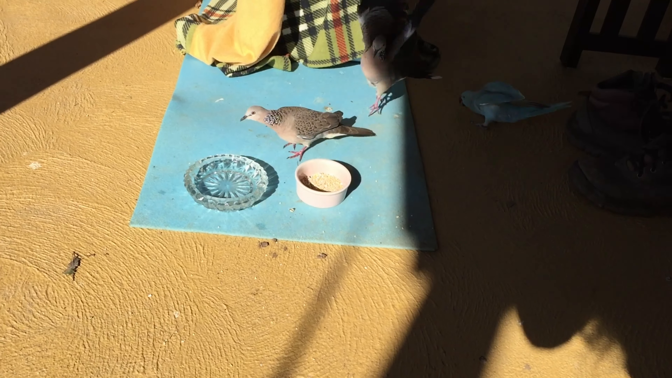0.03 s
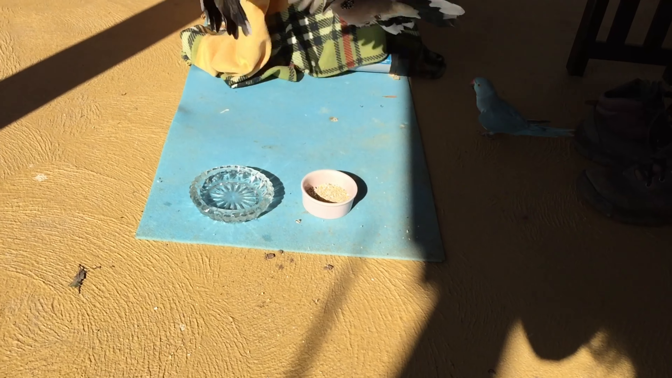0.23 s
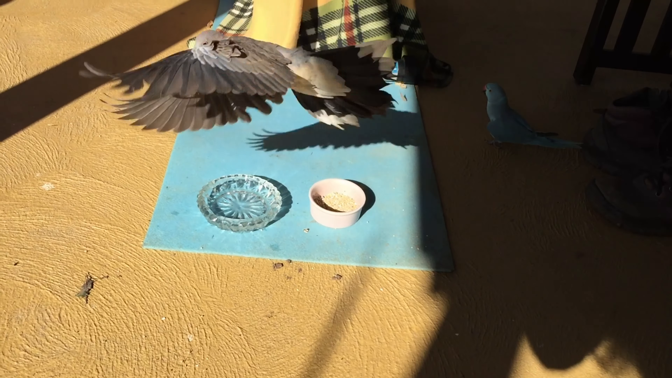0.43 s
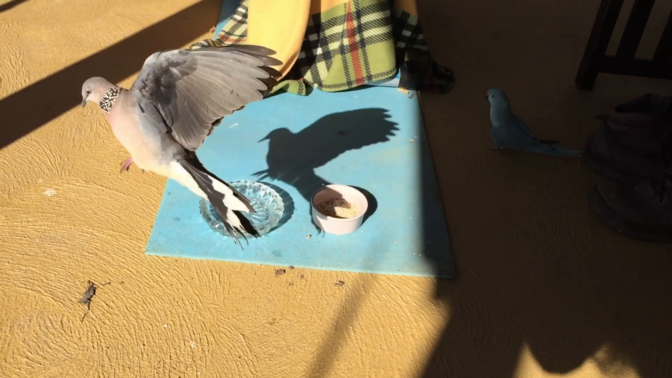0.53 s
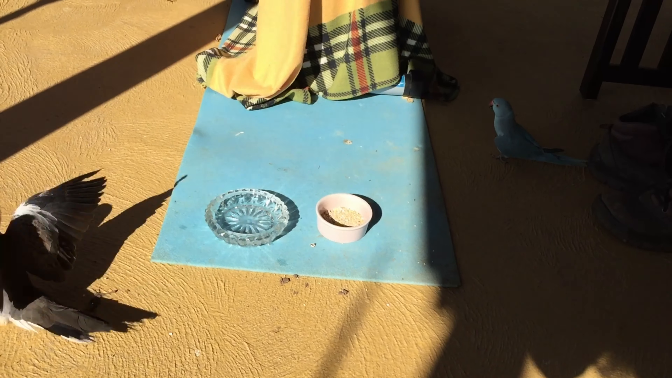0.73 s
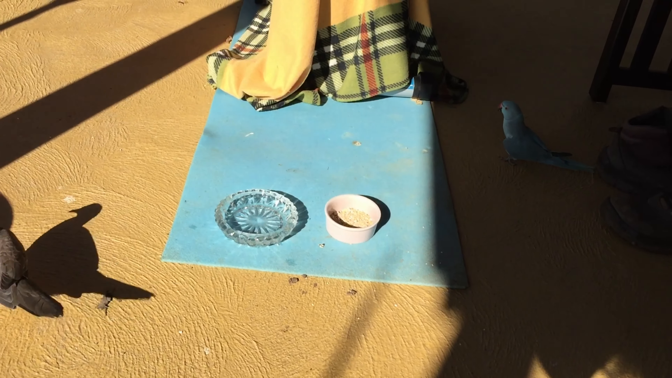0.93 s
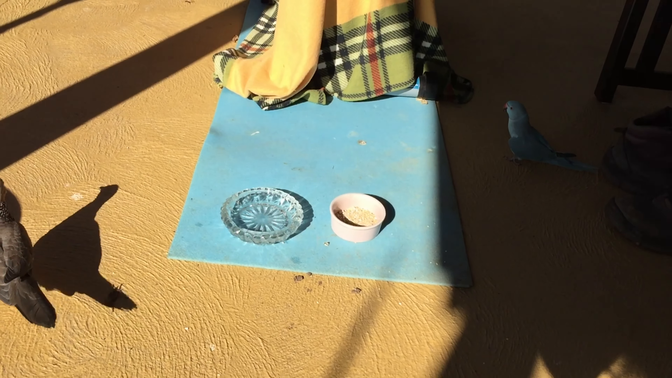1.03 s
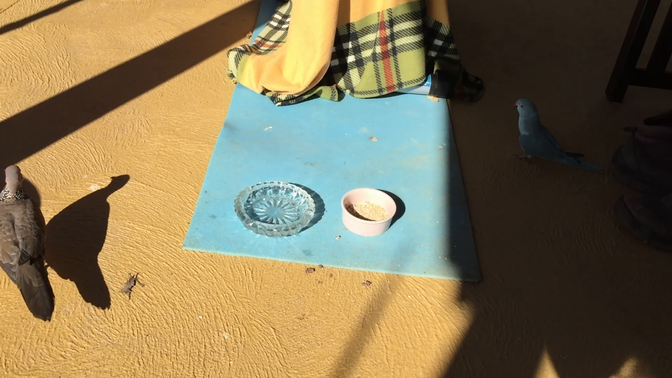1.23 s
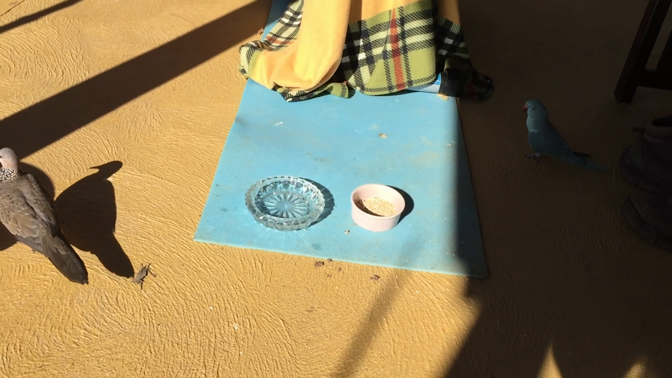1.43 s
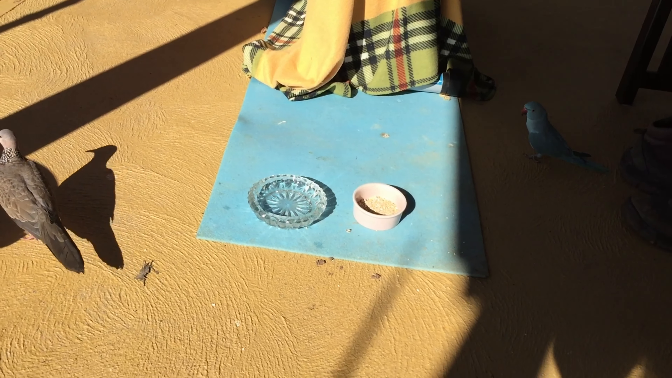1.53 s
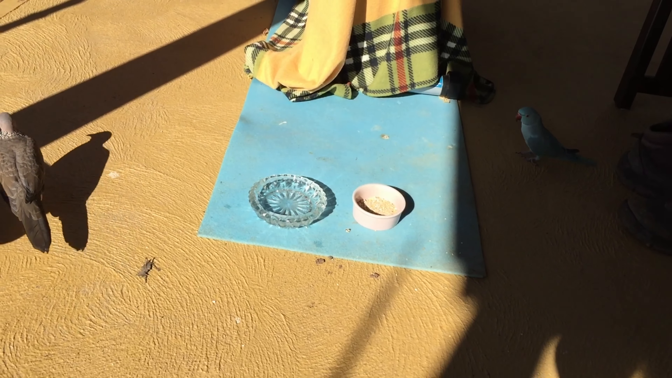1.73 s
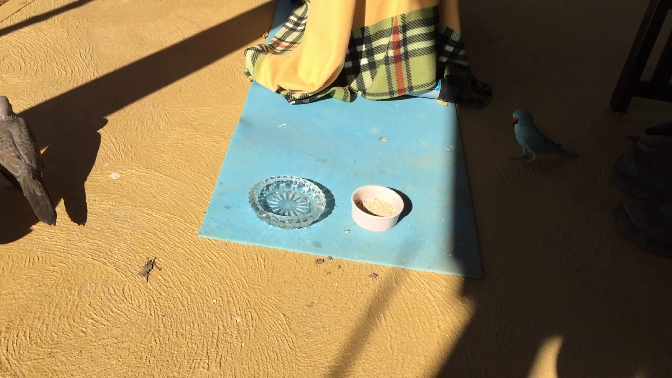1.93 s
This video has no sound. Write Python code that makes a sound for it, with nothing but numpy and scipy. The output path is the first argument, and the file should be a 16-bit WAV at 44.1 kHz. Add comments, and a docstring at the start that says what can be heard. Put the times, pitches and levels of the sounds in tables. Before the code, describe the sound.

Sharp, feathery wing flapping of a dove taking off close by, then faint claw ticks and a scuff

```python
"""A dove takes off beside a feeding bowl on a porch, close by, and settles a step away.
First come small floor ticks (band-filtered noise), then wing strokes (enveloped flicks and air noise),
low puffs (damped sines), short whistles (gliding tones) and one clap (a run of filtered snaps).
Feathers rustle between the strokes; later claws tick and a foot scuffs the floor (noise bursts). The porch
answers by early echoes and a diffuse tail, over an outdoor rumble (shaped noise and a wavering hum)."""
import sys
import numpy as np
from scipy import signal
from scipy.fft import rfft, irfft
from scipy.io import wavfile

SR = 44100
rng = np.random.default_rng(int(sys.argv[2]) if len(sys.argv) > 2 else 0)


def bounce(signal):
    """Save signal as a 16-bit WAV file at the path given by the first command-line argument."""
    frames = np.transpose(np.atleast_2d(signal))
    limited = np.clip(frames, -1, 1)
    pcm = np.round(limited * 32767).astype(np.int16)
    wavfile.write(sys.argv[1], SR, pcm)


N = 88200
T = np.arange(N) / SR  # time axis, s

# Wing strokes: peak t/s, rise t/s, fall t/s, level/dB, tilt above 1 kHz/(dB per octave)
STROKES = [(.188, .004, 0.0092, -32.5, 2), (0.244, .0025, 0.0095, -26.5, 1),
           (.261, .008, 0.0096, -21.5, 0.9), (.268, 0.0047, 0.011, -23.5, -2.5),
           (0.307, 0.0075, 0.0091, -36, -5), (0.337, 0.0053, 0.012, -21, -1.5),
           (0.351, 0.0073, .012, -21.5, -0.9), (.367, .0015, .010, -23.5, 0.5),
           (.388, 0.0067, .020, -29.5, -1.5), (0.434, 0.014, 0.0068, -28.5, 0.5),
           (.456, 0.0072, 0.016, -41, -1), (0.564, 0.018, 0.025, -40, 1.2), (.597, 0.013, 0.012, -37, -0.7),
           (0.709, 0.014, 0.022, -49, 4), (0.834, 0.018, 0.012, -41.5, 0.8),
           (1.246, 0.0022, 0.0065, -48, 0), (1.995, .012, .015, -54, -2)]
# Relative spectrum of the strokes and rustle as heard, with narrow dips near 2750 and 10200 Hz: f/Hz, level/dB
STROKE_SPECTRUM = [(60, -6), (150, -0.5), (370, 0), (520, -4), (750, -1.5), (1000, 2.5), (1600, -2),
                   (2000, -4), (2400, -5.5), (2750, -8.5), (3400, -7), (4800, -9.5), (7000, -10.5),
                   (9000, -11.5), (10200, -16.5), (12500, -15.5), (15500, -23.5)]
# Feather rustle under and between the strokes: t/s, level/dB
RUSTLE_LEVEL = [(0, -56), (.12, -56), (.165, -45.5), (.225, -42.5), (.29, -37.5), (.45, -40), (.52, -47.5),
                (.62, -46.5), (.66, -55.5), (.73, -49.5), (.79, -51), (.97, -53.5), (1.2, -55), (1.45, -62),
                (1.6, -67.5), (2, -64.5)]
# Relative spectrum of a quill snap: f/Hz, level/dB
QUILL_SPECTRUM = [(60, -41), (200, -26), (450, -14), (800, -2), (1500, 0), (2400, -0.5), (2800, -7),
                  (3400, 1), (4800, -7.5), (8200, -2), (10500, -8.5), (13000, -10.5), (16000, -23)]
# Whistling flight feathers: middle t/s, half length t/s, pitch f/Hz, level/dB
WHISTLES = [(0.27, 0.0043, 1180, -24), (0.343, 0.012, 2408, -29.5), (0.433, 0.0055, 1260, -21),
            (0.44, 0.0097, 1120, -31.5), (0.455, .007, 933, -36), (.465, 0.022, 1211, -40.5),
            (0.503, .004, 1244, -38), (1.802, 0.0057, 2174, -52)]
# Puffs of air pushed by the wings: onset t/s, pitch f/Hz, decay t/s, level before the envelope/dB
PUSHES = [(0.184, 171, 0.016, -34.5), (0.263, 225, 0.0044, -16), (0.266, 70, 0.028, -26.5),
          (0.3672, 160, 0.0043, -15.5), (.368, 329, 0.0043, -16), (.366, 72, 0.032, -26),
          (.438, 113.5, 0.012, -28.5), (1.285, 96, 0.023, -34.5)]
# Claws and feathers on the floor: peak t/s, fall t/s, level/dB, centre f/Hz, half-power half-width/octaves
TICKS = [(0.0654, .002, -42.5, 3000, 2.9), (0.067, 0.011, -45.5, 1750, 0.28),
         (0.136, 0.0027, -40, 4630, 0.31), (0.144, 0.0032, -34, 4440, 0.27),
         (0.69, 0.0032, -46.5, 4600, 0.39), (.988, 0.011, -53.5, 2860, 0.21),
         (1.059, 0.024, -49, 1450, 0.46), (1.141, 0.0043, -43.5, 3880, 0.95),
         (1.159, 0.046, -47, 1190, 0.4), (1.347, 0.0021, -41, 8240, .6), (1.360, 0.019, -55, 7600, 0.19),
         (1.412, 0.014, -55.5, 6330, 0.49), (1.470, 0.0057, -52.5, 4640, 0.44),
         (1.533, 0.0018, -51.5, 9000, 1), (1.730, 0.013, -64.5, 11000, 0.71),
         (1.802, 0.0041, -50.5, 1900, 0.16)]
# Relative spectrum of the foot scuff: f/Hz, level/dB
SCUFF_SPECTRUM = [(100, -14), (220, 1.5), (450, -1), (750, -1.5), (1100, 3), (1500, -9), (2500, -8.5),
                  (4300, -18.5), (9000, -25), (15000, -43)]
# Reverberation of the porch: f/Hz, time to decay by 60 dB t/s
PORCH_T60 = [(100, 0.16), (1000, 0.46), (4000, 0.67), (14000, 0.53)]
# Relative spectrum of the outdoor rumble: f/Hz, level/dB
RUMBLE_SPECTRUM = [(20, -46), (36, -16.5), (52, -7), (65, -4.5), (80, -6.5), (105, -7), (140, -12),
                   (200, -19), (320, -30), (600, -64)]
# Course of the rumble: t/s, level/dB
RUMBLE_LEVEL = [(0, -45.5), (.65, -44), (1.2, -45), (1.4, -45.5), (2, -48.5)]
# Relative spectrum of the distant wash: f/Hz, level/dB
YARD_SPECTRUM = [(150, -33), (250, -5), (378, -1.5), (413, -4), (646, -2.5), (717, -8), (837, 1),
                 (1290, -6.5), (2130, -10), (3510, -18.5), (15500, -31)]

BARBS_PER_S, BARB_SPREAD_DB = 4600, 3.5
AIR_SHARE = 0.59  # share of power in smooth air noise
FLUTTER_HZ, FLUTTER_DB = 130, 2
RUSTLE_TILT_DB, RUSTLE_WAVER_DB = 0.38, 1.1  # tilt per octave above 1 kHz; rms waver
CLAP_S, CLAP_DB = .3306, 1.5  # level is energy per quill
QUILL_GAP_S, QUILL_FADE_DB, QUILL_RING_S = .00102, -0.3, 0.0012  # fade is per quill
WHISTLE_SAG_PER_S, WHISTLE_JITTER, OVERTONE_DB = 3, 0.0382, -15.5  # sag and jitter: fractions of pitch
PUSH_RISE_S = 0.0009
TICK_RISE_SHARE = .5  # rise as a share of the fall time
SCUFF_S, SCUFF_RISE_S, SCUFF_FALL_S, SCUFF_DB = 1.274, 0.0037, 0.02, -38
PORCH_DB, EARLY_DB = -14.5, -13.5
RUMBLE_WAVER_DB = 1
HUM_HZ, HUM_DB, HUM_WANDER = 65.25, -49.5, 0.0798  # wander: rms fraction of pitch
YARD_DB, YARD_FADE_DB_PER_S = -55.5, 1.5  # level at 1 s
EDGE_HZ = 15820


def feathers():
    """Superposed impulses and turbulence: barbs flick past each other in rushing air; the vanes flutter."""
    struck = rng.random(N) < BARBS_PER_S / SR
    sign = rng.choice([-1, 1], N)
    strength = amp(BARB_SPREAD_DB * np.minimum(rng.exponential(1, N), 3))
    flicks = evened(struck * sign * strength)
    air = rng.standard_normal(N)
    mixture = np.sqrt(1 - AIR_SHARE) * flicks + np.sqrt(AIR_SHARE) * air
    return mixture * amp(FLUTTER_DB * drift(FLUTTER_HZ))


def wings():
    """Amplitude modulation of broadband noise: strokes swell and die, with feather rustle in between."""
    out = np.zeros(N)
    for s, rise, fall, db, tilt in STROKES:
        out += amp(db) * swell(s, rise, fall) * colour(feathers(), STROKE_SPECTRUM, tilt)
    rustle_db = np.interp(T, *np.transpose(RUSTLE_LEVEL)) + RUSTLE_WAVER_DB * drift(44.6)
    return out + amp(rustle_db) * colour(feathers(), STROKE_SPECTRUM, RUSTLE_TILT_DB)


def clap(count=5):
    """Impact excitation: the wing tips meet in a quick run of quill snaps."""
    snaps = np.zeros(N)
    for k in range(count):
        snaps += amp(QUILL_FADE_DB * k) * evened(snap(CLAP_S + k * QUILL_GAP_S, QUILL_RING_S))
    return amp(CLAP_DB) * np.sqrt(count) * ring(snaps, QUILL_SPECTRUM)


def whistles():
    """Aeroelastic flutter: a feather edge catches the air; its pitch sags as the wing slows."""
    out = np.zeros(N)
    for s, half_length, hz, db in WHISTLES:
        pitch = hz * (1 - WHISTLE_SAG_PER_S * (T - s) + WHISTLE_JITTER * drift(311))
        phase = 2 * np.pi * np.cumsum(pitch) / SR
        tone = evened(np.sin(phase) + amp(OVERTONE_DB) * np.sin(2 * phase))
        hold = 1 / (1 + ((T - s) / half_length) ** 8)
        out += amp(db) * hold * tone
    return out


def pushes():
    """Damped oscillation: the wings push low, quickly decaying puffs of air."""
    out = np.zeros(N)
    for s, hz, decay, db in PUSHES:
        t = np.maximum(T - s, 0)
        envelope = (1 - np.exp(-t / PUSH_RISE_S)) * np.exp(-t / decay)
        out += amp(db) * envelope * np.sin(2 * np.pi * hz * t)
    return signal.sosfilt(signal.butter(4, 36, "high", fs=SR, output="sos"), out)


def feet():
    """Contact noise: small ticks and brushes in narrow or wide bands, and one heavier scuff."""
    out = np.zeros(N)
    for s, fall, db, hz, width in TICKS:
        out += amp(db) * swell(s, TICK_RISE_SHARE * fall, fall) * band(feathers(), hz, width)
    scuff = swell(SCUFF_S, SCUFF_RISE_S, SCUFF_FALL_S) * colour(feathers(), SCUFF_SPECTRUM)
    return out + amp(SCUFF_DB) * scuff


def porch(x, count=8):
    """Reverberation by convolution: early echoes off floor and walls, and a short diffuse tail."""
    hz, t, z = signal.stft(rng.standard_normal(SR), SR, nperseg=256)
    decay = amp(-60 * t / read(PORCH_T60, hz)[:, None])
    build_up = 1 - np.exp(-t / 0.0071)
    tail = signal.istft(z * decay * build_up, SR, nperseg=256)[1]
    response = amp(PORCH_DB) * tail / np.linalg.norm(tail)
    delays = (rng.uniform(.003, .024, count) * SR).astype(int)
    response[delays] += amp(EARLY_DB) * rng.choice([-1, 1], count) / np.sqrt(count)
    return signal.fftconvolve(x, response)[:N]


def yard():
    """Filtered noise with slowly changing level (rumble, faint distant wash) and a frequency-modulated hum."""
    rumble_db = np.interp(T, *np.transpose(RUMBLE_LEVEL)) + RUMBLE_WAVER_DB * drift(9.8)
    rumble = amp(rumble_db) * colour(rng.standard_normal(N), RUMBLE_SPECTRUM)
    hum_pitch = HUM_HZ * (1 + HUM_WANDER * drift(13.9))
    hum = amp(HUM_DB) * evened(np.sin(2 * np.pi * np.cumsum(hum_pitch) / SR))
    wash_db = YARD_DB + YARD_FADE_DB_PER_S * (1 - T) + drift(9.8)
    wash = amp(wash_db) * colour(rng.standard_normal(N), YARD_SPECTRUM)
    return rumble + hum + wash


def amp(db):
    """Logarithmic level: decibels to amplitude gain."""
    return 10 ** (np.asarray(db) / 20)


def evened(x):
    """Power normalization: scales to rms 1."""
    return x / np.sqrt(np.mean(x ** 2) + 1e-20)


def read(points, hz):
    """Interpolation of a spectrum on a logarithmic frequency axis."""
    f, value = np.transpose(points)
    return np.interp(np.log(hz + 1), np.log(f + 1), value)


def colour(x, points, tilt_db=0):
    """Spectral shaping: imposes a spectrum and a tilt per octave above 1 kHz, at rms 1."""
    hz = np.fft.rfftfreq(N, 1 / SR)
    gain_db = read(points, hz) + tilt_db * np.log2(np.maximum(hz / 1000, 1))
    return evened(irfft(rfft(x) * amp(gain_db), N))


def band(x, centre_hz, octaves):
    """Band-pass filtering: keeps a flat-topped band, at rms 1."""
    away = np.log2((np.fft.rfftfreq(N, 1 / SR) + 1) / centre_hz) / octaves
    return evened(irfft(rfft(x) / np.sqrt(1 + away ** 4), N))


def drift(hz):
    """Low-pass random process: chance variation up to a rate, rms 1."""
    lowpass = np.exp(-(np.fft.rfftfreq(N, 1 / SR) / hz) ** 2)
    return evened(irfft(rfft(rng.standard_normal(N)) * lowpass, N))


def ring(x, points, size=2048):
    """Minimum-phase filtering: colours clicks causally, to energy 1."""
    log_gain = np.log(amp(read(points, abs(np.fft.fftfreq(size, 1 / SR)))))
    # the phase follows from the log gain by the Hilbert transform
    taps = np.fft.ifft(np.exp(np.conj(signal.hilbert(log_gain)))).real
    return evened(signal.oaconvolve(x, taps[:size // 2])[:N]) / np.sqrt(N)


def swell(s, rise, fall):
    """Transient envelope: Gaussian rise to time s, exponential decay after it."""
    return np.exp(-(np.minimum(T - s, 0) / rise) ** 2 - np.maximum(T - s, 0) / fall)


def snap(s, decay):
    """Impulsive excitation: a tiny noise burst with an instant start and exponential decay."""
    return (T >= s) * np.exp(-np.maximum(T - s, 0) / decay) * rng.standard_normal(N)


def scene():
    """Superposition: bird, its porch reverberation, the unreverberated air puffs and the yard."""
    bird = wings() + clap() + whistles() + feet()
    return (bird + porch(bird) + pushes() + yard())[None]


def record(dry):
    """Band limitation: a linear-phase low-pass removes the extreme treble."""
    taps = signal.firwin(511, EDGE_HZ, window=("kaiser", 9), fs=SR)
    return signal.oaconvolve(dry, taps[None], "same")


dry = scene()
out = record(dry)
bounce(out)
```